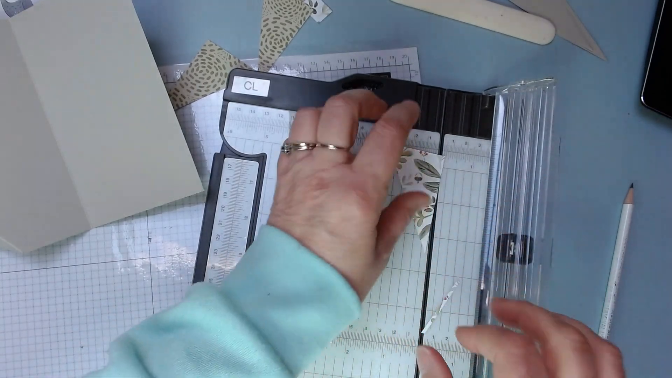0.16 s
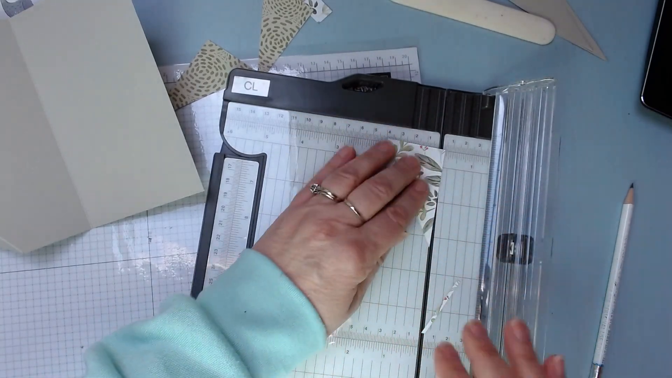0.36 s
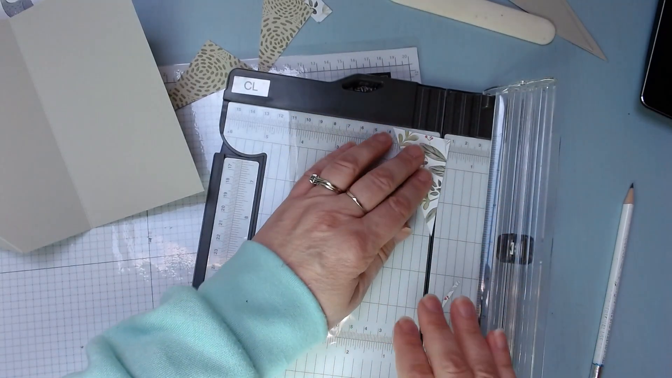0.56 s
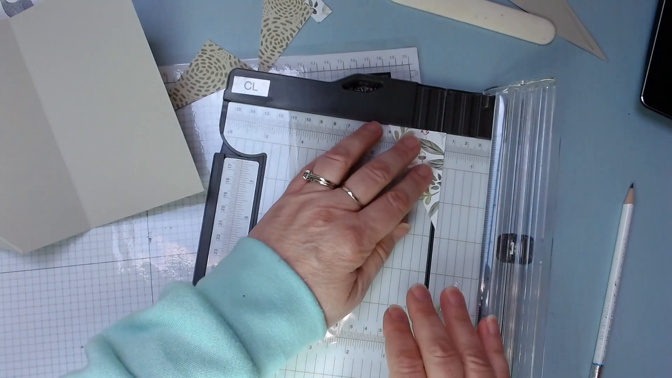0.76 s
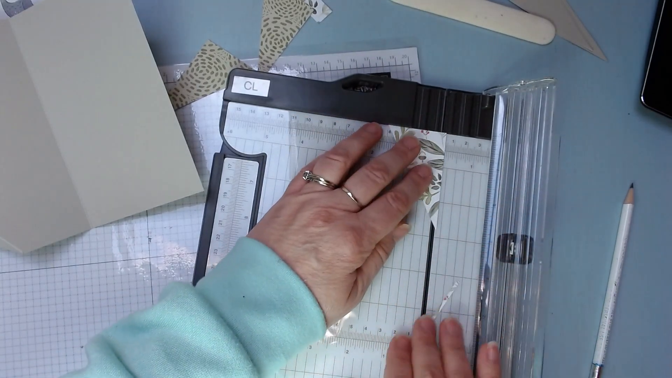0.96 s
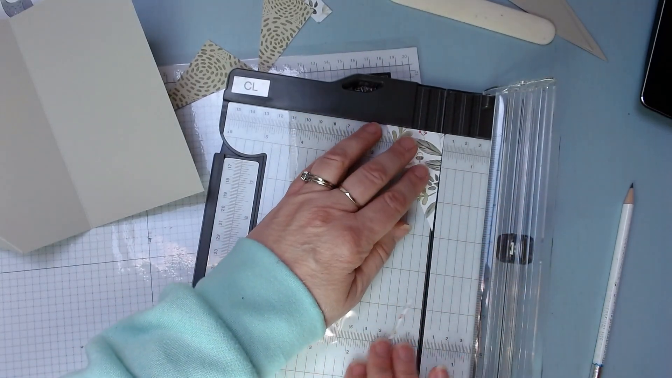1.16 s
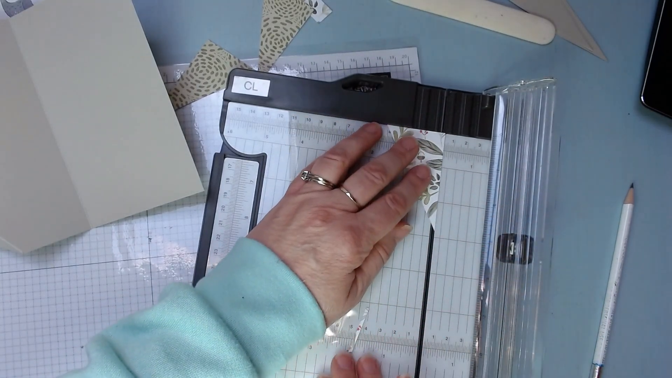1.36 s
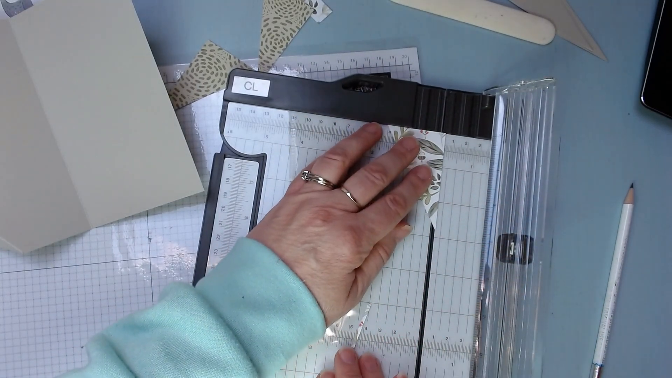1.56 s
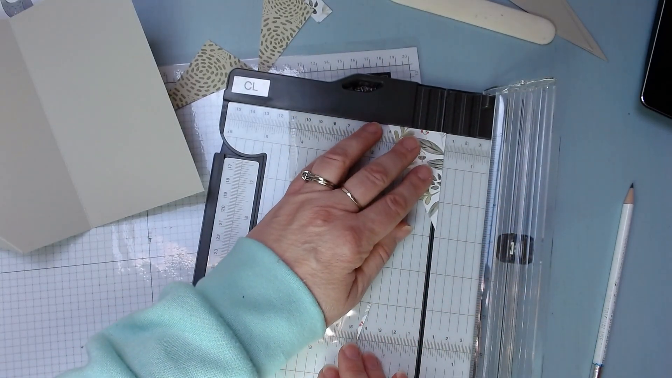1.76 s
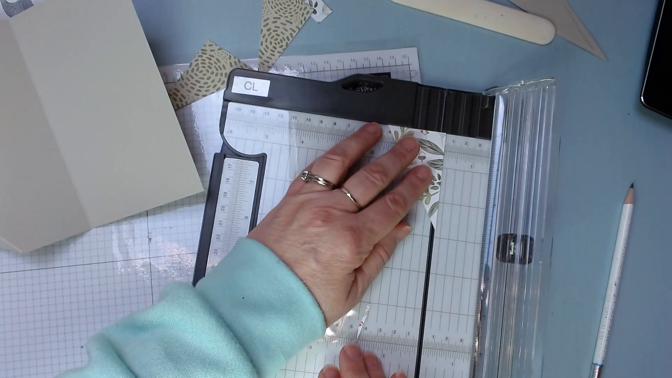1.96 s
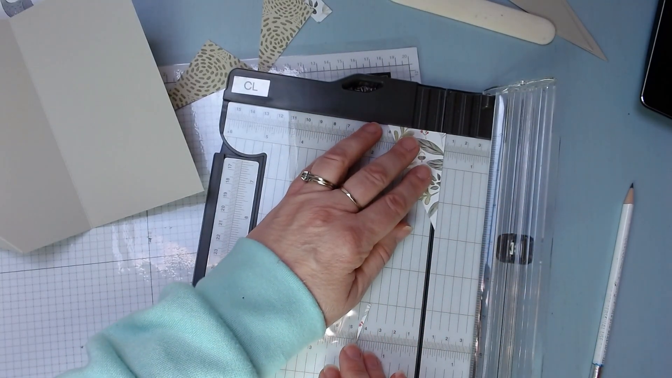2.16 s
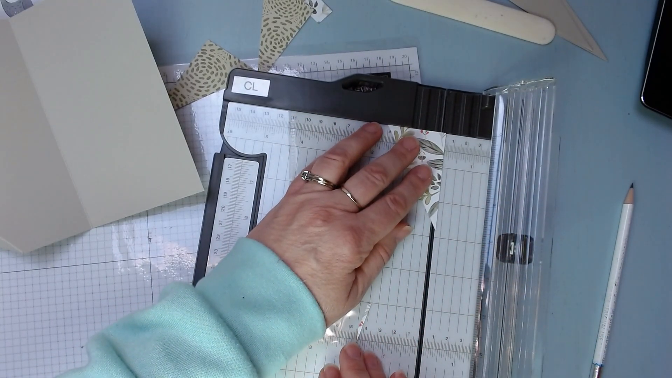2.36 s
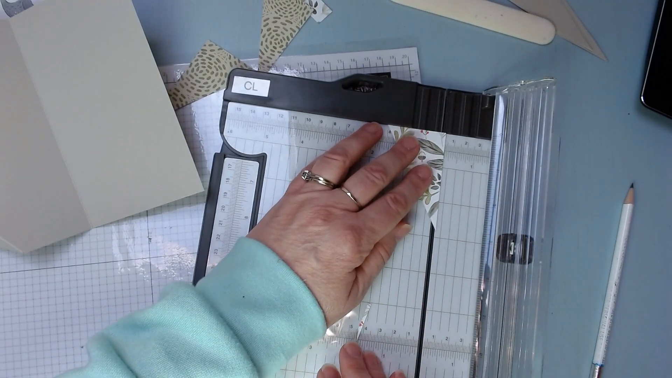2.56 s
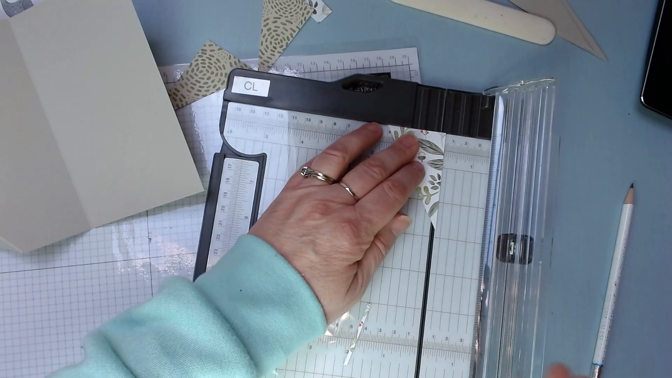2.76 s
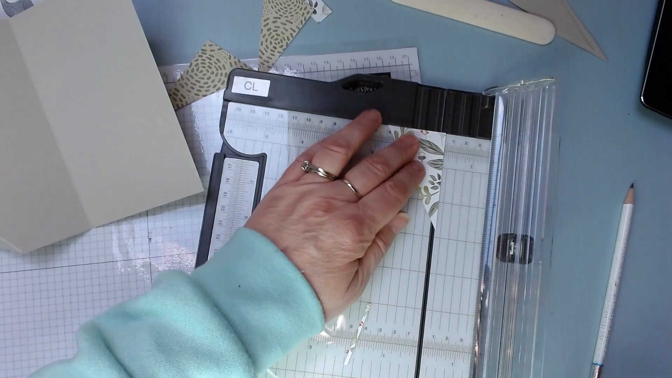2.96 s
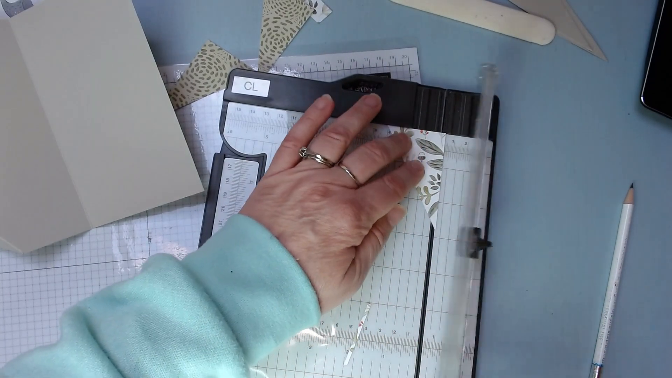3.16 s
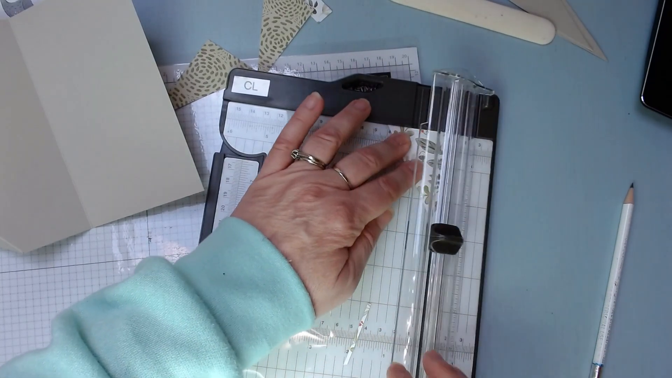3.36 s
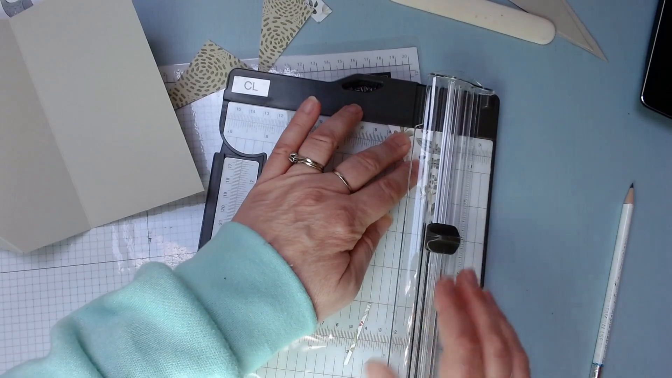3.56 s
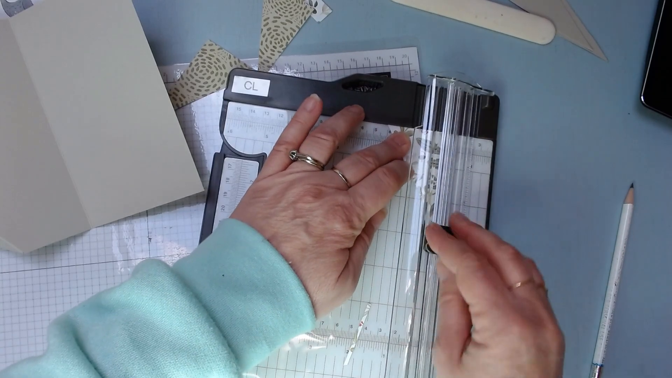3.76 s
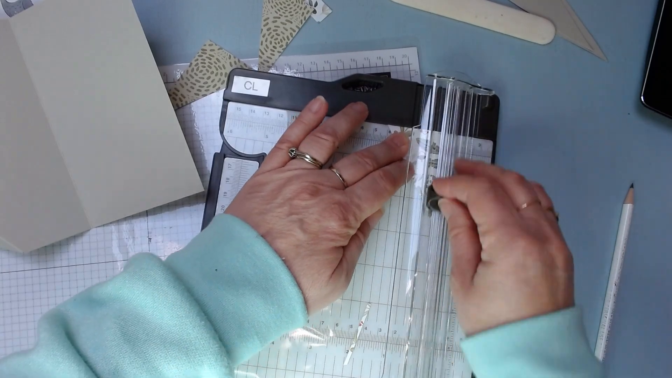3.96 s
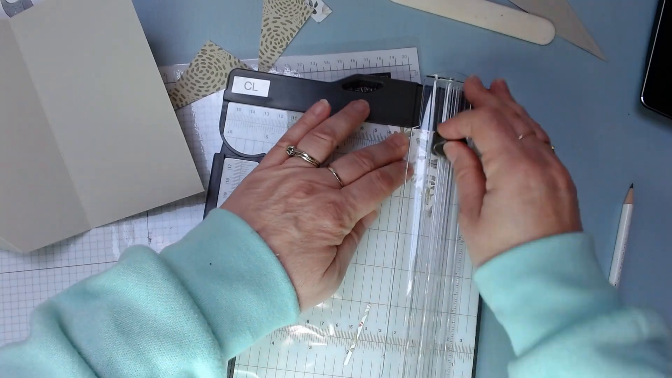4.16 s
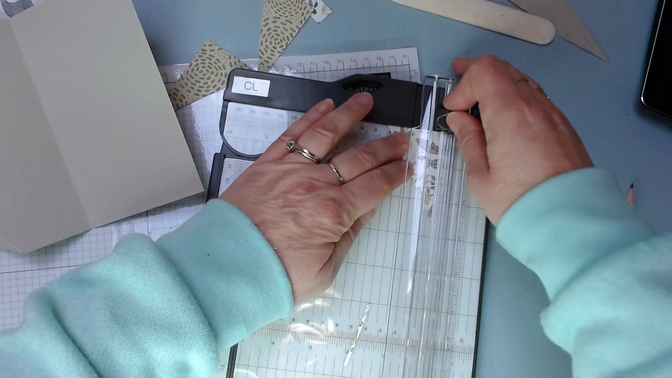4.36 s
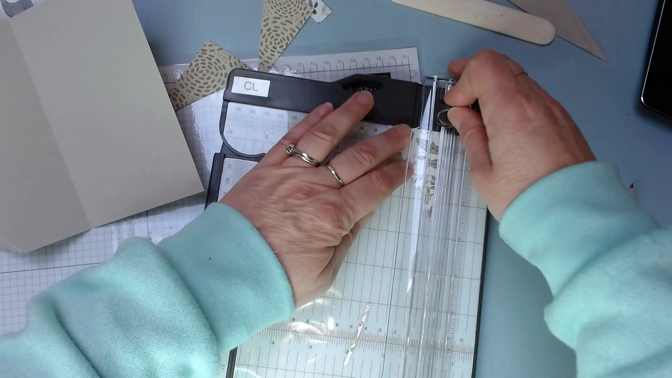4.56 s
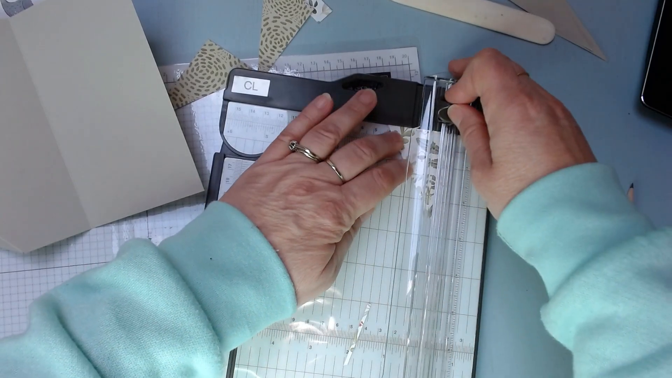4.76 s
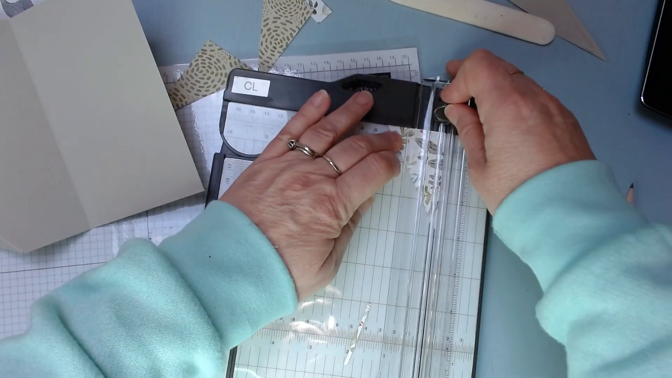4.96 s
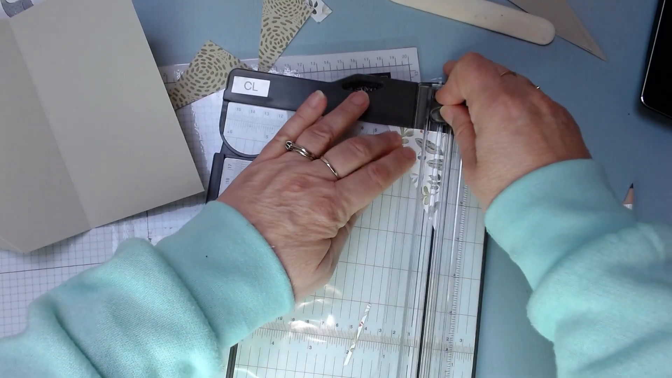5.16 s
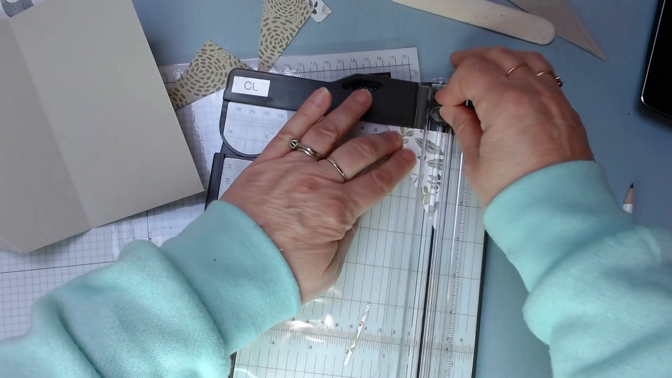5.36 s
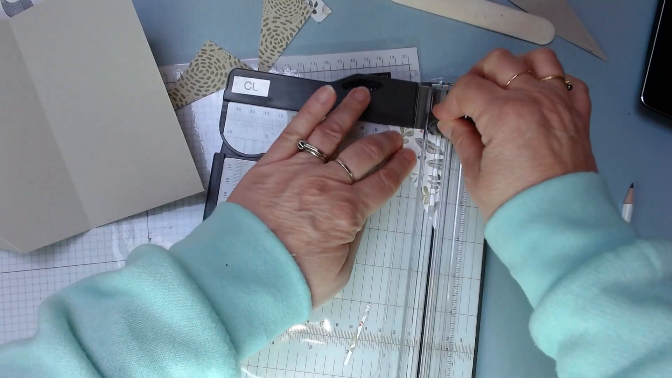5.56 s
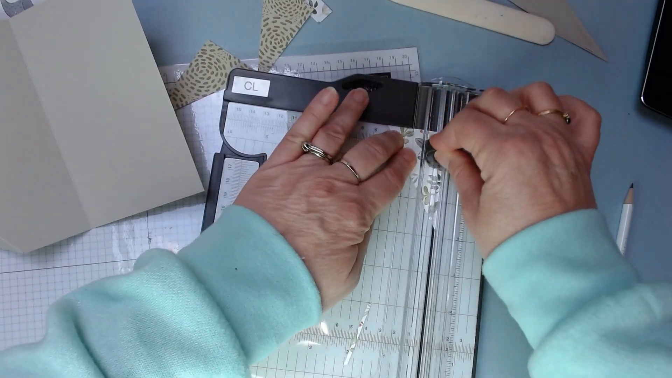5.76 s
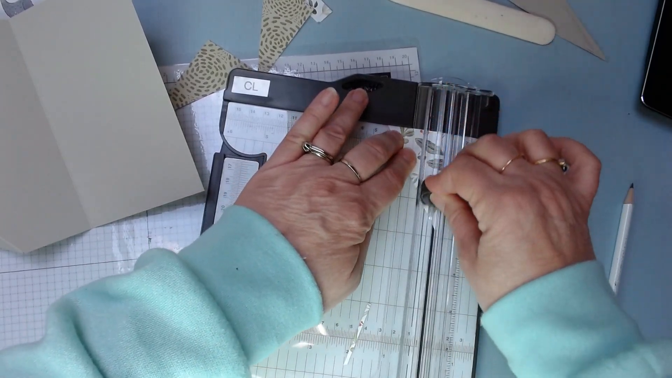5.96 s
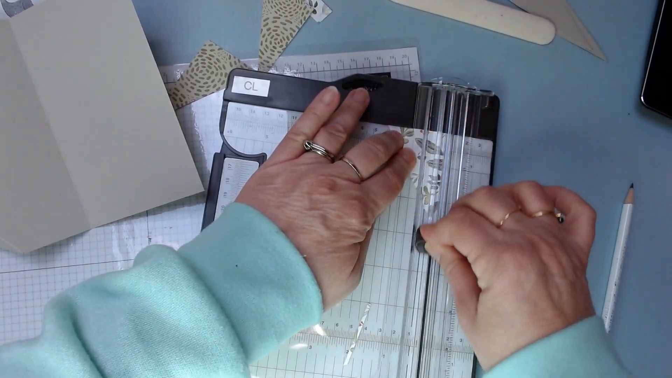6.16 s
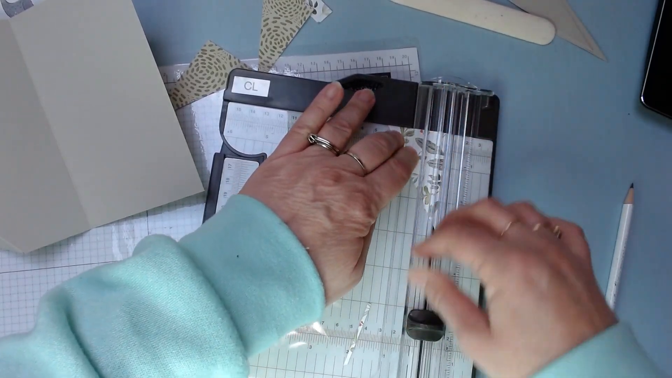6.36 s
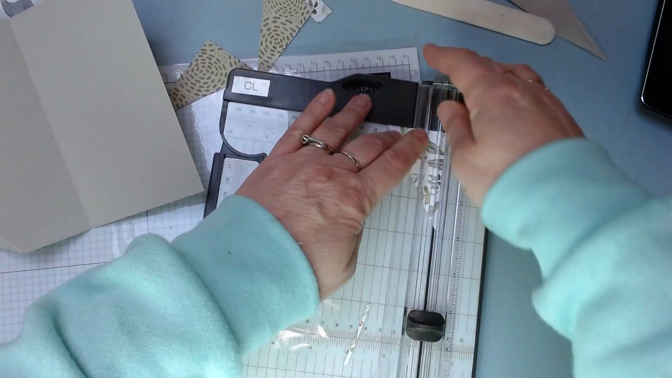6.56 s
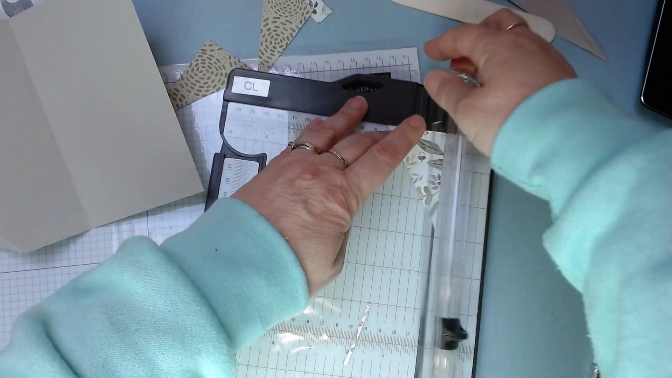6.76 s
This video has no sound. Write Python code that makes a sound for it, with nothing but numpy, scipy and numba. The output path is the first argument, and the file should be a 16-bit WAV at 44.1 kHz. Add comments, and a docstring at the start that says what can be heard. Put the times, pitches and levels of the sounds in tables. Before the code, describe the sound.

Crackly card strokes and sharp little edge snaps come first, then near quiet with muted fingertip taps. Hollow plastic clatters and dull desk thumps follow as a rail is moved. Two very loud, slightly clipped knocks stand out over a second apart, before a dry, grainy cutting swish. Close, somewhat dull microphone, short indoor reflections, steady hum, hiss and a barely audible whine.

```python
"""A desk in a small room, under a low hum, a hiss and a faint whine. A hand slides card onto a plastic paper
trimmer (crackly noise), folds its rail down (knocks, thumps and jostling), clicks the blade carriage to the top
with two loud knocks and draws it down the rail (stick-slip noise through moving resonances).
Blows ring banks of decaying modes. The microphone dulls the treble; the loudest peaks clip."""
import sys
import numpy as np
from scipy import signal
from scipy.fft import rfft, irfft, next_fast_len
from scipy.io import wavfile
from scipy.ndimage import uniform_filter1d
from numba import njit

SR = 44100
rng = np.random.default_rng(int(sys.argv[2]) if len(sys.argv) > 2 else 0)


def to_wav(s):
    """Save 16-bit WAV."""
    ch = np.atleast_2d(s).T  # columns
    pcm = np.round(np.clip(ch, -1, 1) * 32767)  # PCM
    wavfile.write(sys.argv[1], SR, pcm.astype(np.int16))


N = 300321

# All levels but those of the air are before the microphone.
# Spectrum of the room and electronic hiss. Each row: frequency in Hz, relative density in dB.
AIR_SPECTRUM = [(20, -1), (97, -7), (180, -14), (380, -20), (722, -22.5), (2050, -31.5), (7410, -39.5),
                (8030, -39), (9430, -61.5), (12000, -64), (15600, -91.5), (22000, -120)]
# Faint steady electronic tone. Each row: frequency in Hz, RMS level in dB.
WHINE_TONES = [(8000, -82.5)]
AIR_DB, HUM_HZ, HUM_DB = -49.5, 88, -53  # RMS levels
# Reverberation in bands. Each row: centre in Hz, 60 dB decay time in seconds, level in dB.
ROOM_BANDS = [(257, 0.53, -1), (756, 0.55, -16), (2080, 0.43, -13), (5130, 0.12, -17)]

# Resonances of the desk top. Each row: frequency in Hz, relative level in dB, 60 dB decay time in seconds.
DESK_MODES = [(45.4, 5, 0.49), (71, -3.5, 0.043), (91.35, 3, 0.29), (108.3, -3, 0.27), (178.9, 5.5, 0.25)]
# Dull thumps into the desk top. Each row: start in seconds, peak in dB, pitch in Hz.
DESK_THUMPS = [(0.703, -31, 81), (0.944, -28.5, 70), (1.826, -39, 105), (3.398, -29.5, 73),
               (3.658, -25, 104.5), (3.728, -27.5, 91), (3.845, -26.5, 106), (3.938, -30, 112),
               (4.122, -29, 144), (4.303, -30.5, 77), (4.421, -26, 119), (4.504, -24, 89.5),
               (5.091, -28.5, 126), (5.313, -30.5, 74.5), (5.448, -30, 67.8), (5.536, -27, 92.5),
               (5.791, -21, 87.8), (5.8, -23, 177), (6.078, -26.5, 131.5)]
# Resonances of the desk mat. Each row: frequency in Hz, relative level in dB, 60 dB decay time in seconds.
MAT_MODES = [(1590, 1.5, 0.04), (2270, 4, 0.029), (2900, -5, 0.028)]
# Fingertip taps on the mat. Each row: start in seconds, push peak in dB, nail tick peak in dB.
FINGER_TAPS = [(1.7462, -27.5, -52), (1.8309, -21, -35)]
PAD_HZ, PAD_T60_S = 238, 0.0079

# Strokes of card and skin. Each row: start in seconds, length in seconds, hiss level in dB (2 dB above what the
# # stroke reaches at its end), hiss centre in Hz at the start, hiss centre in Hz at the end.
CARD_STROKES = [(0.068, 0.081, -49.5, 3800, 4300), (0.32, 0.041, -40, 2100, 2100),
                (0.372, 0.051, -35.5, 3200, 3800), (0.485, 0.082, -46.5, 5500, 7100),
                (0.632, 0.018, -44, 2300, 3700), (0.658, 0.076, -40.5, 2800, 5000),
                (0.749, 0.078, -55, 4500, 5200), (1.015, 0.087, -54, 6000, 8100),
                (1.276, 0.037, -55.5, 6000, 9000), (1.388, 0.01, -60, 6900, 5100),
                (1.67, 0.022, -55, 7000, 5800), (3.64, 0.1, -57, 2400, 960),
                (3.795, 0.046, -50, 2400, 1500), (4.921, 0.028, -46.5, 5500, 17000),
                (5.077, 0.0076, -37.5, 6000, 17000)]
STROKE_ATTACK_S, STROKE_SWELL_DB, STROKE_FADE_DB_PER_S = 0.015, 2, 446

# Resonances of the trimmer's plastic body. Each row: frequency in Hz, relative level in dB,
# 60 dB decay time in seconds.
BODY_MODES = [(274, 14.5, 0.086), (325, 3, 0.13), (412.3, 6, 0.094), (566.3, 10, 0.044), (663, 6.5, 0.059),
              (781.6, 3.5, 0.035), (960, 4.5, 0.04), (1150, 11, 0.039), (1223, 13, 0.013),
              (1493, 10, 0.017), (1822, 9.5, 0.017), (2213, 3, 0.029), (2316, 7, 0.035), (2570, 6, .018)]
# Hands working the rail, one curve per fit of jostling. Each row: time in seconds, body level in dB,
# body centre in Hz.
RAIL_SHUFFLE = [
    [(0, -51.5, 329), (.2, -50, 325), (.27, -59, 336), (.5, -57.5, 341)],
    [(3.2, -86, 896), (3.34, -61.5, 1170), (3.48, -59.5, 682), (3.6, -53, 593), (3.72, -47, 676),
     (3.9, -51.5, 595), (4.05, -51, 495), (4.17, -49, 400), (4.25, -60.5, 400), (4.33, -44.5, 507),
     (4.48, -48, 618)],
    [(4.7, -57.5, 510), (5.4, -50.5, 526), (5.62, -63.5, 478), (5.77, -40, 497)],
]
# Knocks on the trimmer. Each row: start in seconds, body peak in dB, body centre in Hz, crack peak in dB,
# chatter in ms, focus on the centre in dB per octave squared.
TRIMMER_TAPS = [(0.5949, -37.5, 900, -43.5, 2.2, 12), (0.659, -34, 607, -48, 1.8, 6.5),
                (0.7111, -34, 630, -47, 0.59, 9), (0.941, -38, 634, -44, 0.4, 1),
                (1.5158, -43.5, 1230, -70, 3.4, 40), (3.261, -36.5, 625, -42, 1.5, 17),
                (3.408, -36.5, 700, -43, 3, 6), (3.5277, -24.5, 1550, -35.5, 0.46, 55),
                (3.5457, -29, 990, -47, 1.9, 8), (3.6074, -29.5, 630, -40, 0.88, 9),
                (3.629, -36, 684, -38, 3.6, 15), (3.655, -30, 790, -32.5, 2, 2.5),
                (3.668, -28, 643, -42, 7, 11), (3.6846, -29, 2140, -37, 5, 22),
                (3.7, -29, 1230, -45, 5.2, 17), (3.7377, -34, 684, -53, 1.3, 1.5),
                (3.8289, -29.5, 480, -32.5, 4.5, 4), (3.8508, -23.5, 954, -29, 4.2, 0.5),
                (3.946, -27.5, 684, -43, 4.1, 3.5), (3.988, -35.5, 1160, -60, 1.7, 43),
                (4.0654, -35, 1160, -64, 3.6, 58), (4.1315, -27, 1040, -39, 3.7, 18),
                (4.2809, -23.5, 1120, -30.5, 4.5, 10), (4.327, -27, 1190, -32, 2.9, 16),
                (4.442, -34, 1130, -48, 1.5, 25), (4.48, -27.5, 1060, -40, 11, 8),
                (4.5044, -1, 870, -4, 0.9, 4), (4.5301, -11.5, 940, -6, 0.61, 11),
                (4.819, -29.5, 710, -41.5, 1.3, 24), (4.9725, -39, 710, -42, 4.7, 5.5),
                (5.103, -34, 870, -39, 6.5, 12), (5.3439, -31, 925, -24.5, 2.7, 5),
                (5.4419, -27, 900, -32, 2.2, 12), (5.451, -23.5, 620, -33.5, 5.7, 15),
                (5.4711, -24, 920, -19, 5.5, 3.5), (5.4878, -21.5, 710, -26, 3.6, 7.5),
                (5.52, -25, 1110, -41.5, 3.1, 1.5), (5.5264, -16, 547, -36, 1.4, 42),
                (5.572, -29, 422, -38, 2.6, 22), (5.5868, -21.5, 520, -40.5, 2.9, 15),
                (5.7322, -17, 1018, -24.5, 1.3, 8.5), (5.774, -16, 547, -38, 3.8, 6.5),
                (6.08, -28.5, 400, -72.5, 12, 15), (6.102, -27.5, 300, -68, 12, 9)]
TAP_CRACK_HZ, CRACK_BRIGHTENS = 2400, 0.0055  # the pitch rises by this many dB per dB of crack above -35 dB
# Brighter snaps of card edges and hard plastic. Each row: start in seconds, body peak in dB,
# body centre in Hz, crack peak in dB, crack centre in Hz.
HARD_SNAPS = [(0.0704, -31, 1080, -34, 3920), (0.088, -23, 920, -16.5, 4340),
              (0.149, -33, 1310, -26.5, 5130), (0.318, -43, 990, -41.5, 4000),
              (0.369, -43.5, 970, -36, 5500), (0.4413, -42, 1500, -27, 3500),
              (0.443, -31.5, 1140, -12, 5440), (0.7338, -42, 890, -12, 5400), (0.7435, -34, 640, -36, 4300),
              (0.932, -42, 610, -37, 5700), (3.424, -46, 665, -35, 3470), (3.807, -38, 600, -33.5, 3430),
              (4.4151, -30.5, 557, -23, 7200), (4.7359, -33, 1350, -24.5, 4300),
              (5.0852, -27.5, 637, -20, 6700), (5.785, -15.5, 1100, -12.5, 3480),
              (5.7933, 1.5, 734, 10, 4760), (5.7966, -13.5, 1677, 1.5, 1870),
              (5.8347, -23, 740, -9.5, 3700)]
SNAP_CHATTER_MS, SNAP_FOCUS_DB = 1.4, 6.0

# Resonances of the rail. Each row: frequency in Hz when loudest, width in Hz, relative level in dB,
# time in seconds into the cut when loudest, seconds it stays loud, glide in Hz per second.
RAIL_MODES = [(1290, 59, -9, 0.1, 0.089, 600), (2054, 80, -6, 0.292, 0.028, 201),
              (2490, 91, -7.5, 0.44, 0.14, 3), (2915, 87, -1, 0.192, 0.074, 901),
              (3650, 150, -4, 0.12, 0.12, -500), (4380, 440, -8, 0.11, 0.43, 1198),
              (5570, 880, -8.5, 0.24, .15, 3003), (4860, 440, -6, 0.45, 0.088, 2006),
              (6630, 300, -15.5, .2, .12, 1001)]
CUT_START_S, CUT_ATTACK_S, CUT_ARCH_S = 6.274, 0.0071, 0.61
RASP_DB, RASP_ARCH_DB = -34.5, 2  # the arch lifts the rasp mid-stroke
DRUM_DB, DRUM_SAG_DB_PER_S = -32, 8.5
NEAR_DB = 15  # boost of a rail resonance when the carriage favours it
DIP_HZ, DIP_HZ_PER_S = 5650, 4500

TOP_HZ = 17500


def undb(db):
    """Amplitude factor for a level in dB."""
    return 10 ** (np.asarray(db) / 20)


def unit(x):
    """Scale to an RMS of 1."""
    return x / np.sqrt(np.mean(x ** 2))


def peak(x, db):
    """Scale to a peak level in dB."""
    return undb(db) * x / np.abs(x).max()


def add(out, start_s, sound):
    """Lay a sound into the mix at its start."""
    i = int(start_s * SR)
    out[i:i + len(sound)] += sound[:N - i]


@njit
def svf(x, hz, width):
    """State-variable band-pass whose centre may move, gain 1 at the centre."""
    y, b, l = np.empty(len(x)), 0., 0.
    for i in range(len(x)):
        g, k = np.tan(np.pi * hz[i] / SR), width / hz[i]
        v = (b + g * (x[i] - l)) / (1 + g * (g + k))
        b, l, y[i] = 2 * v - b, l + 2 * g * v, k * v
    return y


def band(x, hz, width):
    """Band-pass around a fixed or moving centre, width in Hz."""
    return svf(x + 1e-18, np.clip(hz, 20, SR / 2.3) + np.zeros(len(x)), 1. * width)


def lowpass(x, order, hz):
    """Butterworth treble cut."""
    return signal.sosfilt(signal.butter(order, hz, fs=SR, output="sos"), x)


def read(tables, quiet):
    """Columns of curve tables at every sample, with the quiet values outside the tables."""
    t, out = np.arange(N) / SR, np.outer(quiet, np.ones(N))
    for table in tables:
        s, *columns = np.transpose(table)
        inside = (t >= s[0]) & (t <= s[-1])
        out[:, inside] = [np.interp(t[inside], s, c) for c in columns]
    return out


def walk(rate):
    """Random levels held 1 / rate s and slewed; spread near 1."""
    k = int(SR / rate)
    steps = np.repeat(rng.standard_normal(N // k + 1), k)
    return 1.2 * uniform_filter1d(steps, k)[:N]


def grains(rate, scatter_db):
    """Random clicks of either sign at a mean rate per second, a few much larger than most."""
    hit = rng.random(N) < rate / SR
    sign, size = rng.standard_normal(N), rng.exponential(size=N)
    return unit(hit * sign * undb(scatter_db * size))


def ring(modes, centre_hz, t, lag, focus_db):
    """One blow: modes near its centre ring loudest, the low ones start late as bending waves spread."""
    hz, db, t60 = (c[:, None] for c in np.transpose(modes))
    luck = rng.standard_normal((2, len(modes), 1))  # every blow lands a little differently
    weight = undb(db + 2 * luck[0] - focus_db * np.log2(hz / centre_hz) ** 2)
    late = np.maximum(t - lag * centre_hz / hz, 0)
    hz = hz * (1 + .012 * luck[1])
    return np.sum(weight * np.sin(2 * np.pi * hz * late) * undb(-60 * late / t60), axis=0)


def even(sound, hz):
    """A single click of the same energy and centre but smooth colour."""
    impulse = np.eye(1, len(sound))[0]
    click = band(band(impulse, hz, 1.95 * hz), hz, 1.32 * hz)
    return click * np.sqrt(np.sum(sound ** 2) / np.sum(click ** 2))


def air():
    """Steady hiss of room and electronics, a wavering low hum and a faint whine."""
    f, db = np.transpose(AIR_SPECTRUM)
    size = next_fast_len(N)
    bins_hz = np.arange(size // 2 + 1) * SR / size
    shape = undb(np.interp(np.log(bins_hz + 1), np.log(f), db))
    hiss = unit(irfft(rfft(rng.standard_normal(size)) * shape, size)[:N])
    t = np.arange(N) / SR
    whine = sum(undb(d) * np.sqrt(2) * np.sin(2 * np.pi * hz * t) for hz, d in WHINE_TONES)
    hum_level = undb(HUM_DB + 0.85 * walk(6.2)) * np.sqrt(2)
    hum = hum_level * np.sin(2 * np.pi * np.cumsum(HUM_HZ + 2.5 * walk(2.3)) / SR)
    return undb(AIR_DB) * hiss + whine + hum


def room(x):
    """Reflections: grainy noise that dies away faster in the treble."""
    t = np.arange(22050) / SR
    tail = 0
    for hz, t60, db in ROOM_BANDS:
        part = band(rng.standard_normal(len(t)) ** 3, hz, 1.3 * hz)  # cubing makes it grainy
        part = part * undb(-60 * t / t60) * np.minimum(t / 0.0027, 1)
        tail = tail + undb(db) * part * np.sqrt(2 * hz / SR / np.sum(part ** 2))
    return signal.fftconvolve(x, tail)[:N]


def microphone(x):
    """The response sags above the presence range, dips once and then falls off steeply, leaving a trace."""
    trace = undb(-47.0) * band(x, 11500., 6000.)
    x = lowpass(x, 4, 6200.)
    x = x - 1.4 * band(x, 8000.0, 1000.0)
    return lowpass(x, 14, 9500.) + trace


def thumps():
    """The desk top swings a few cycles after each push."""
    out, t = np.zeros(N), np.arange(16000) / SR
    for s, db, hz in DESK_THUMPS:
        swing = (1 - np.exp(-t / 0.0042)) * ring(DESK_MODES, hz, t, 0.00022, 11.2)
        add(out, s, peak(swing, db))
    return out


def finger():
    """A soft pad pushes the mat for one swing; the nail ticks it."""
    out, t = np.zeros(N), np.arange(3000) / SR
    for s, db, tick_db in FINGER_TAPS:
        push = -np.sin(2 * np.pi * PAD_HZ * t) * np.minimum(t / 0.001, 1) * undb(-60 * t / PAD_T60_S)
        tick = ring(MAT_MODES, 2000., t, 0, 0)
        add(out, s, peak(push, db) + peak(tick, tick_db))
    return out


def patchy(fibres, hz, width):
    """A resonance of the card sheet that wanders in pitch and comes and goes."""
    level = undb(4.3 * walk(45))
    return level * unit(band(fibres, hz * (1 + 0.19 * walk(16)), width))


def rubbing():
    """Card fibres catch and slip: each stroke swells, slides in colour and fades; a crackly hiss."""
    t, power, hz = np.arange(N) / SR, np.zeros(N), np.full(N, 4000.)
    for s, length, db, from_hz, to_hz in CARD_STROKES:
        along = np.clip((t - s) / length, 0, 1)
        attack = np.clip((t - s) / STROKE_ATTACK_S, 0, 1)
        fade_db = STROKE_FADE_DB_PER_S * np.maximum(t - s - length, 0)
        level = attack * undb(db - STROKE_SWELL_DB * (2.0 - along) - fade_db)
        power = power + level ** 2
        hz = np.where(t >= s, from_hz + (to_hz - from_hz) * along, hz)
    fibres = grains(2500, 2.5) * undb(1.5 * walk(55))
    sheet = 0.72 * patchy(fibres, 2440.0, 500.)
    sheet = sheet + 0.88 * patchy(fibres, 5740.0, 2200.0)
    sheet = sheet + 0.9 * patchy(fibres, 6300.0, 2000.0)
    return np.sqrt(power) * unit(unit(band(fibres, hz, 770.0)) + sheet)


def body(force, centre_hz, focus_db):
    """A stream of small blows rings the trimmer's resonances, most those near the centre."""
    out = 0
    for k, (hz, db, t60) in enumerate(BODY_MODES):
        weight = (-1) ** k * undb(db - focus_db * np.log2(hz / centre_hz) ** 2)
        out = out + weight * band(force, hz, 6.1 / t60 + 30)
    return unit(out)


def shuffle():
    """Loose parts jostle against the body in uneven fits of tiny knocks."""
    db, hz = read(RAIL_SHUFFLE, [-120, 500])
    fits_db = 3.3 * walk(26)
    return undb(db + fits_db) * body(grains(700, 1.5), hz, 9.)


def taps():
    """Each tap chatters for a few ms, rings the body and throws off a crack; also what the walls receive."""
    out, spread, t = np.zeros(N), np.zeros(N), np.arange(6000) / SR
    blows = []
    for s, body_db, body_hz, crack_db, chatter_ms, focus_db in TRIMMER_TAPS:
        crack_hz = TAP_CRACK_HZ * undb(CRACK_BRIGHTENS * max(crack_db + 35, 0))  # harder is brighter
        blows.append((s, body_db, body_hz, crack_db, crack_hz, chatter_ms, focus_db))
    blows += [(*row, SNAP_CHATTER_MS, SNAP_FOCUS_DB) for row in HARD_SNAPS]
    for s, body_db, body_hz, crack_db, crack_hz, chatter_ms, focus_db in blows:
        chatter = max(chatter_ms, .3) / 1000
        grit = rng.standard_normal((2, len(t)))
        # the first blow, then loose rebounds that die out
        rebounds = grit[0, :1500] ** 3 * np.exp(-t[:1500] / (3.7 * chatter)) / 8
        force = 0.061 * np.sqrt(chatter_ms) * rebounds
        force[0] = 1
        knock = signal.fftconvolve(ring(BODY_MODES, body_hz, t, 0.001142, focus_db), force)[:len(t)]
        # the knock carries no deep bass
        knock = signal.sosfilt(signal.butter(2, 110., "high", fs=SR, output="sos"), knock)
        burst = grit[1] * (1 - np.exp(-t / (0.092 * chatter))) * np.exp(-t / (1.21 * chatter))
        crack = band(burst, crack_hz, 0.48 * crack_hz)
        crack = lowpass(crack, 3, min(5.6 * crack_hz, SR / 3))
        crack = crack + 0.44 * np.roll(crack, int(rng.uniform(15, 60)))  # the desk top mirrors the crack
        knock, crack = peak(knock, body_db), peak(crack, crack_db)
        add(out, s, knock + crack)
        # summed over all directions the peaks and dips of the radiation even out
        add(spread, s, even(knock, body_hz) + even(crack, crack_hz))
    return out, spread


def rail_rasp(t):
    """Stick-slip excites the rail; each resonance is favoured in turn as a dip in the treble climbs."""
    slips = grains(7000, 1.) * undb(1.3 * walk(90))
    rail = 0
    for k, (hz, width, db, near_s, stay_s, glide) in enumerate(RAIL_MODES):
        near_db = NEAR_DB * np.exp(-((t - near_s) / stay_s) ** 2)
        drift = 1 + .012 * walk(12)
        flicker_db = 2.2 * walk(40)
        tone = unit(band(slips, (hz + glide * (t - near_s)) * drift, width))
        rail = rail + (-1) ** k * undb(db + near_db + flicker_db) * tone
    rasp = rail / np.std(rail[t > 0]) + .5 * unit(band(slips, 3800., 4500.))
    rasp = rasp - 0.39 * band(rasp, DIP_HZ + DIP_HZ_PER_S * t, 550.0)
    return rasp / np.std(rasp[t > 0])


def cut():
    """Dense stick-slip of the drawn blade carriage rasps the rail, drums the body and shakes the desk."""
    t = np.maximum(np.arange(N) / SR - CUT_START_S, 0)
    grip = np.minimum(t / CUT_ATTACK_S, 1) ** 2
    rasp_db = RASP_DB + RASP_ARCH_DB * np.sin(np.pi * t / CUT_ARCH_S)
    drum_db = DRUM_DB - DRUM_SAG_DB_PER_S * t
    rasp = rail_rasp(t)
    blows = grains(4000, 2.) * undb(2 * walk(30))
    desk = 0
    for hz, db, _ in DESK_MODES:
        desk = desk + undb(db - 8.7 * np.log2(hz / 115) ** 2) * band(blows, hz, 28.0)
    drum = body(blows, 570.0, 3.4) + 0.48 * unit(desk)
    return grip * (undb(rasp_db) * rasp + undb(drum_db) * drum)


def scene():
    """Direct sound and its reflections through the microphone, over the air."""
    hits, spread = taps()
    drags = rubbing() + shuffle() + cut()
    near = hits + drags + thumps() + finger() + room(spread + 1.57 * drags)
    return (microphone(near) + air())[None]


def record(dry):
    """The loudest peaks clip; the top is cut."""
    return lowpass(np.clip(dry, -.99, .99), 8, TOP_HZ)


dry = scene()
out = record(dry)
to_wav(out)
```